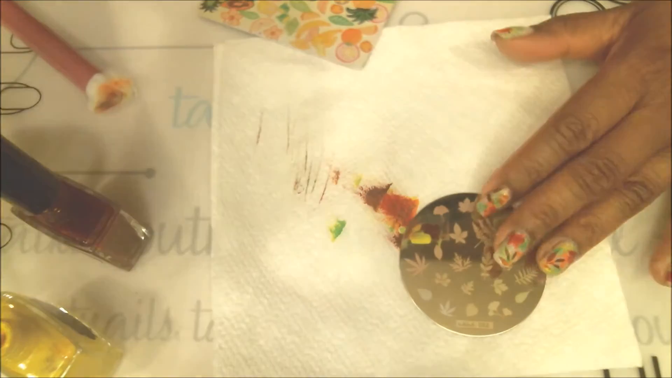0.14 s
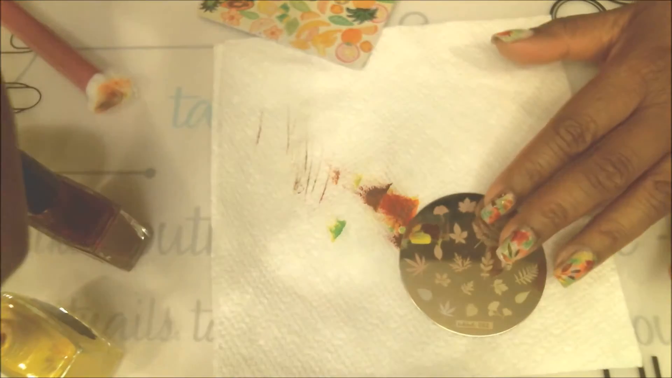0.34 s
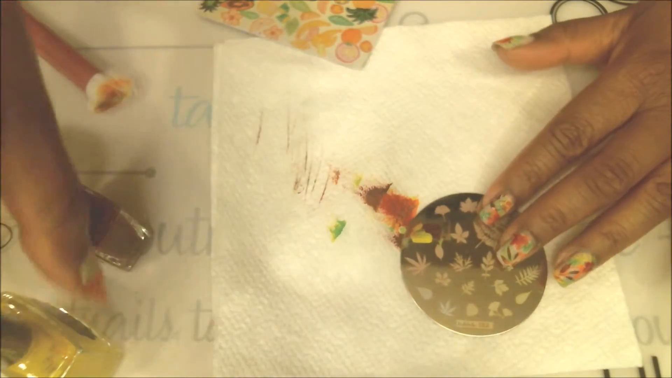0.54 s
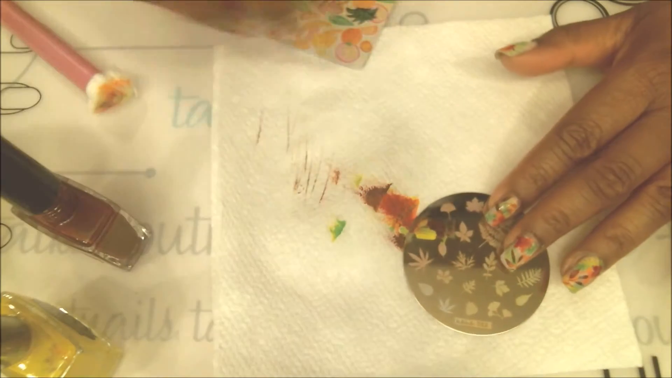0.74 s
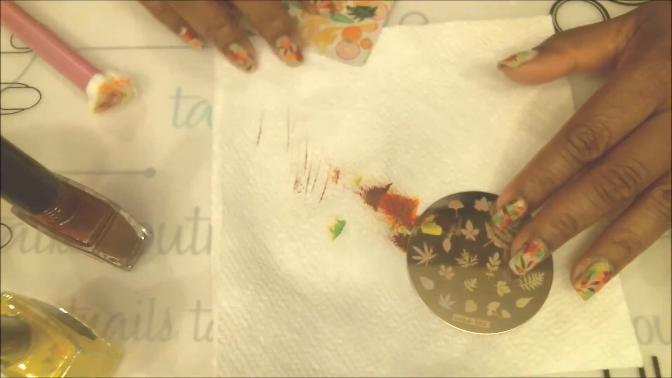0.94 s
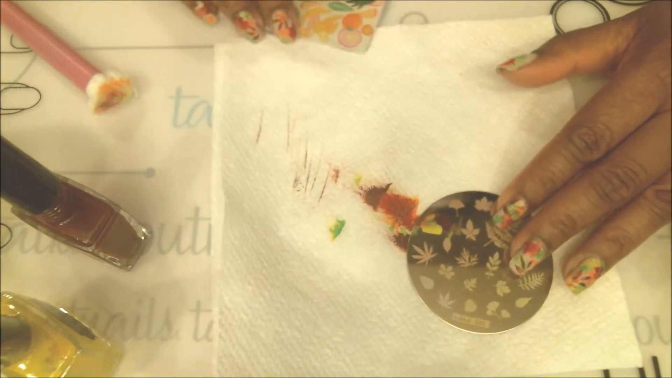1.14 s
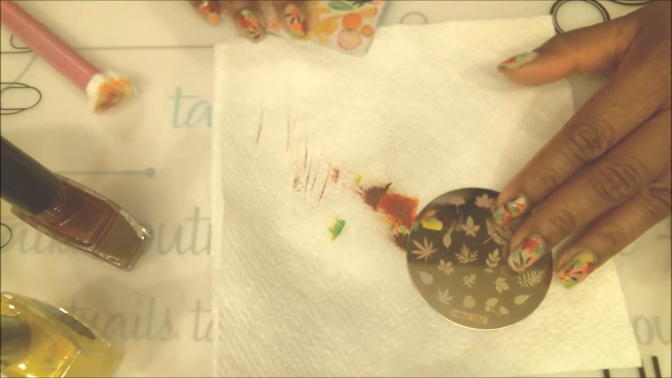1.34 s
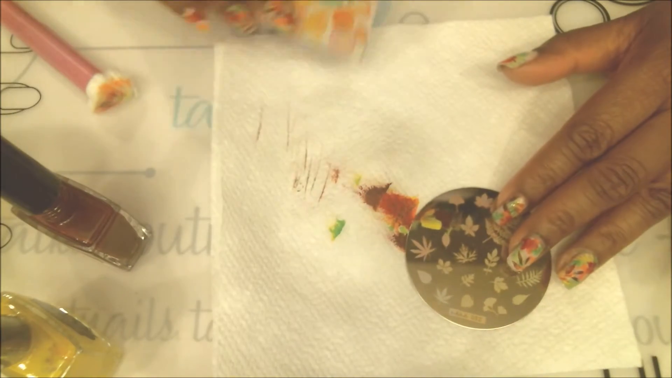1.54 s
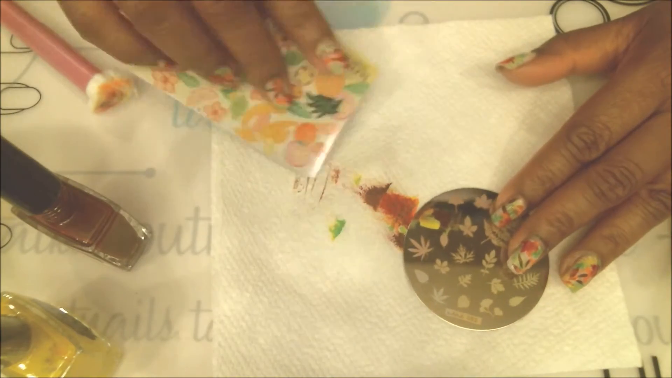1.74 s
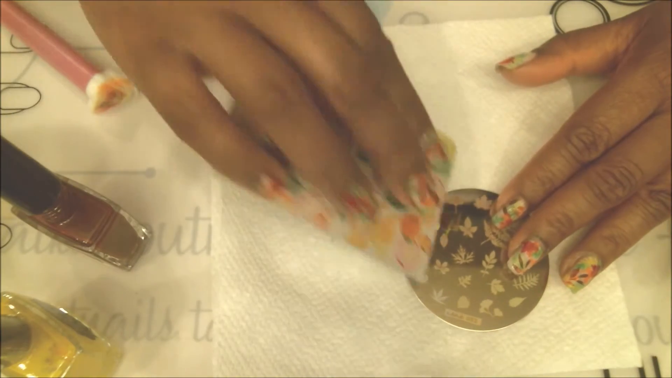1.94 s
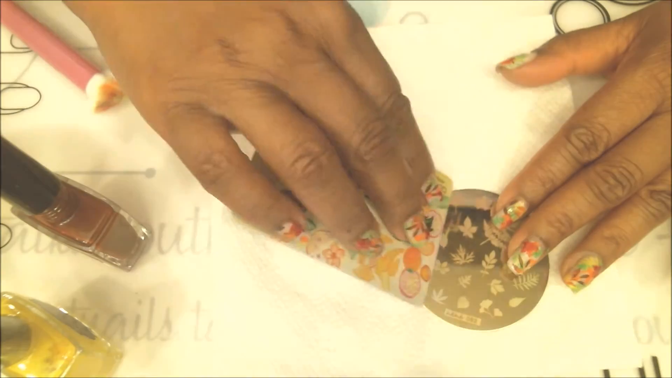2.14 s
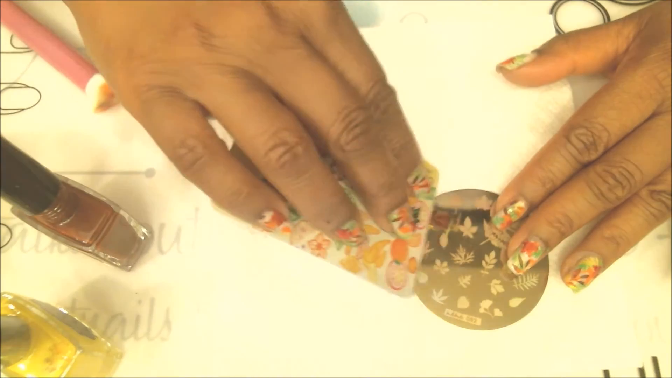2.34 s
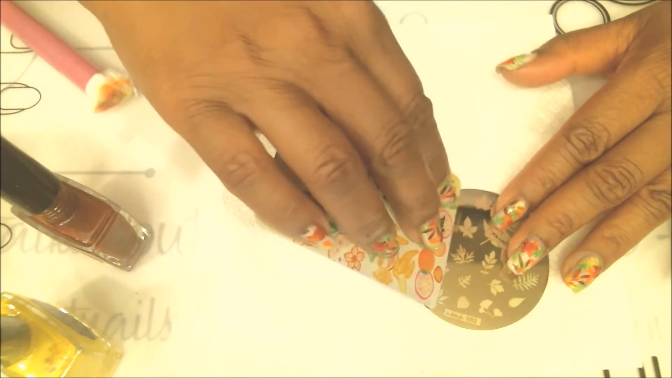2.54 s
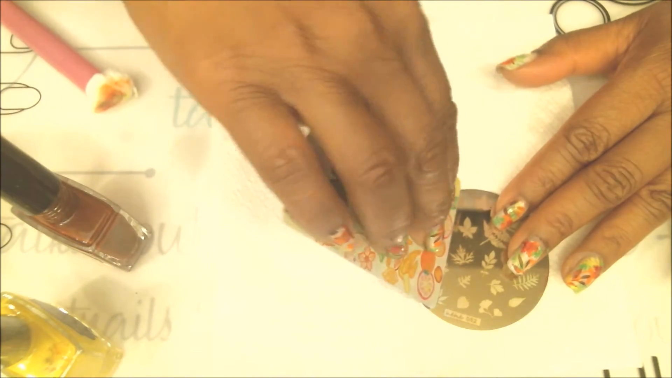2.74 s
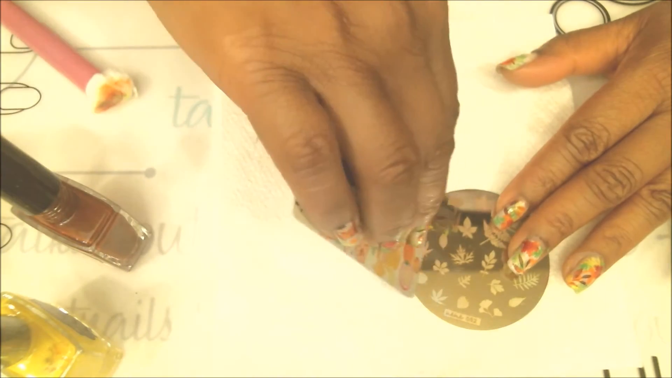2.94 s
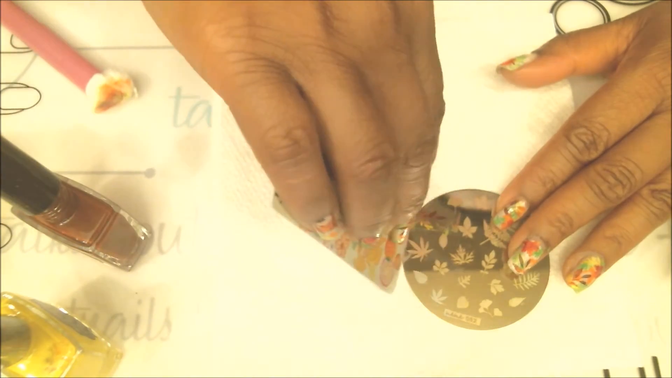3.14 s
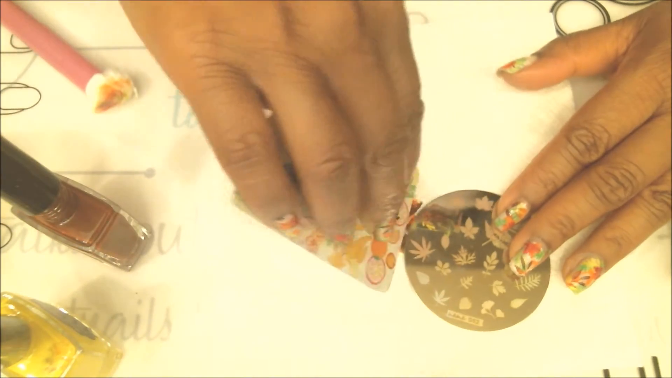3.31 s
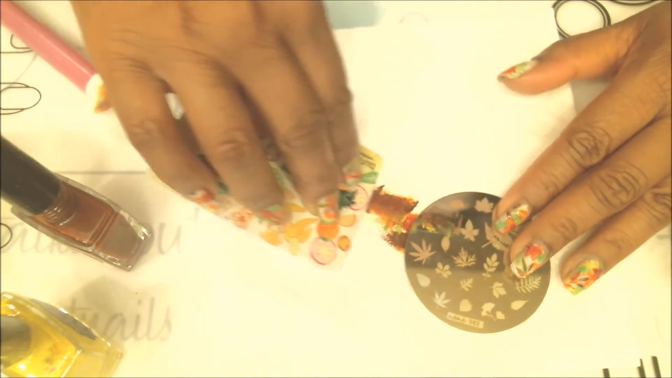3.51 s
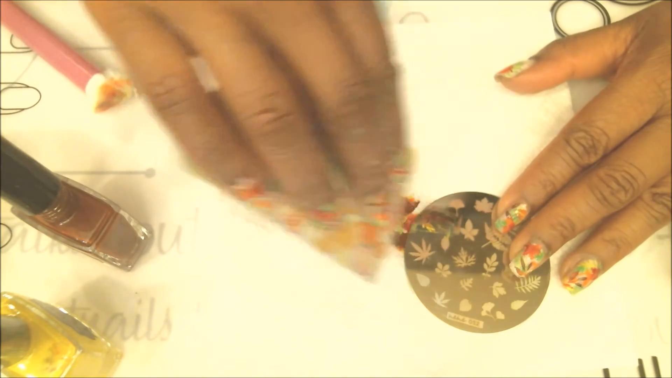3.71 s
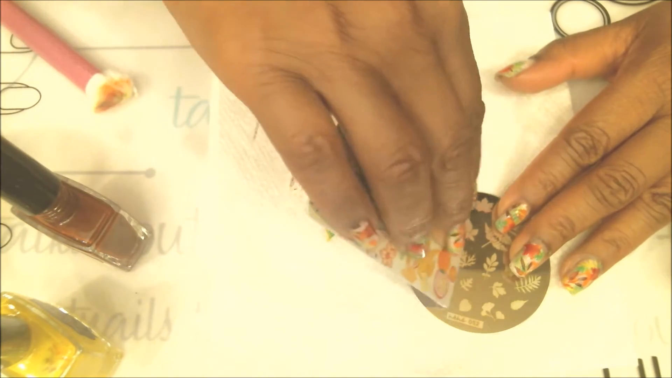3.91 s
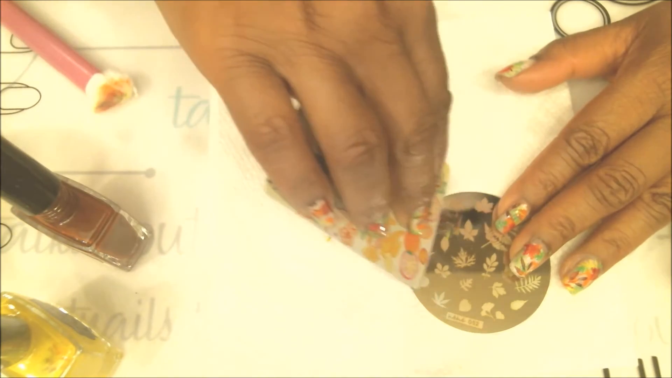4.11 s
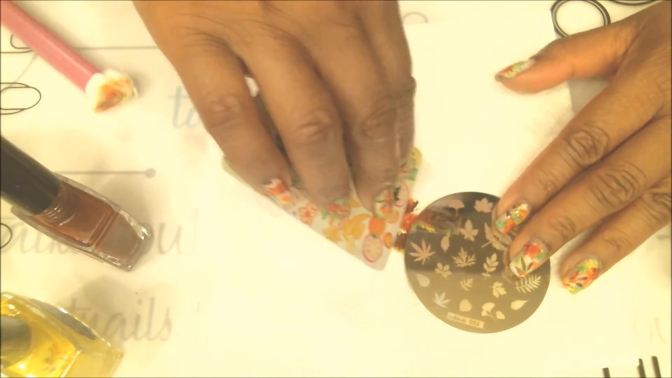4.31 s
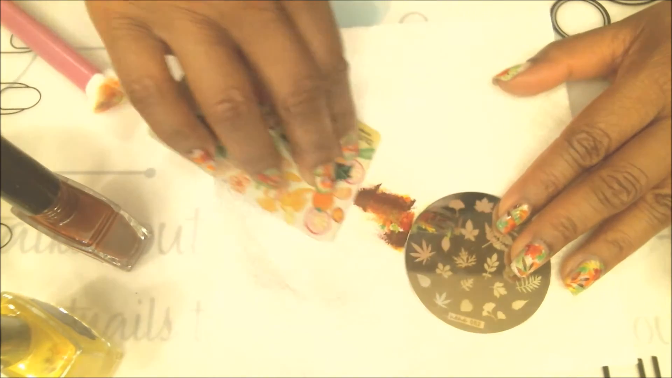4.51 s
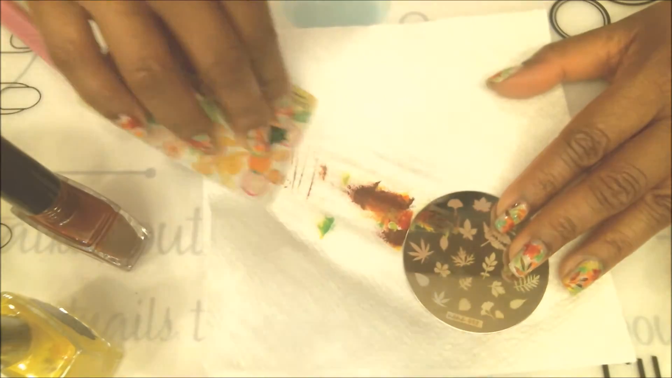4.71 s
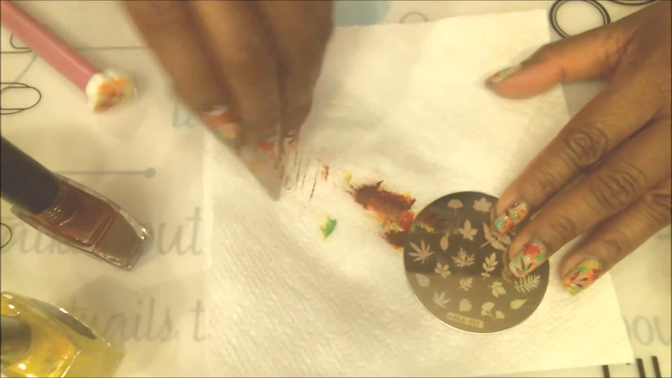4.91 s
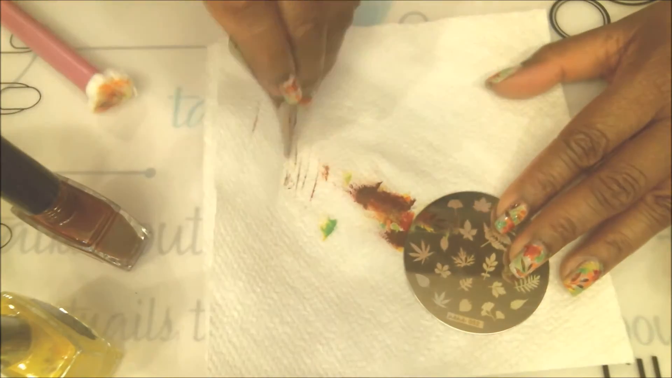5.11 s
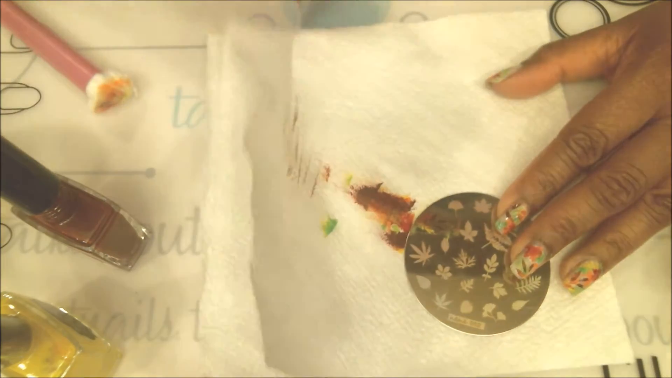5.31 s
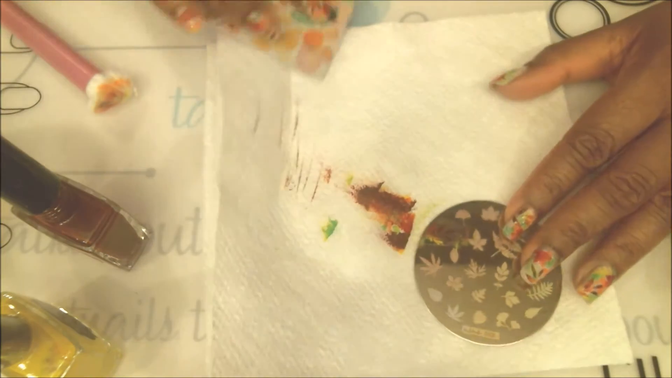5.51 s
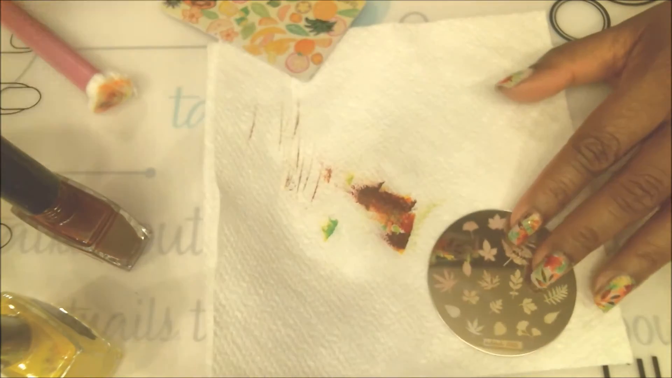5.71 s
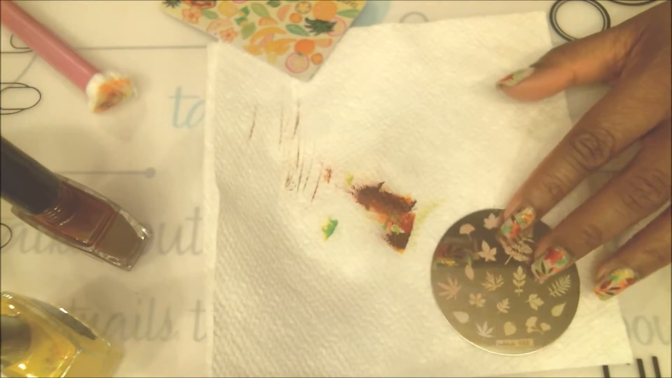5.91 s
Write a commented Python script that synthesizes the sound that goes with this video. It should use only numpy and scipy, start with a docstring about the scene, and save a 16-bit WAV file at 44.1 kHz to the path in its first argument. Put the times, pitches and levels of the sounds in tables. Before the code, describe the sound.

A plastic card slides softly off a table with light clicks, knocks and a brief squeak. It is dragged twice across a small steel plate with a fine hiss; each time it snaps off the rim, the plate clacks down and the card hisses on over a paper towel. A hand thumps the table, then the card is wiped and dropped with a short bounce. The microphone is close, in a small quiet room.

```python
"""A plastic scraper card is slid off a table, set on a small steel stamping plate and dragged across it
twice, its edge hissing in countless tiny slips. Each time it snaps off the rim, the plate slaps down,
and the card hisses on over a paper towel; then it is wiped on the towel and dropped, bouncing.
Between strokes the card clicks, knocks and squeaks under a fingernail, and the hand bumps the table.
A close microphone in a small quiet room, with a faint electrical ticking in its noise floor."""
import sys
import numpy as np
from scipy import signal
from scipy.fft import rfft
from scipy.io import wavfile
from scipy.ndimage import uniform_filter1d

SR = 44100
rng = np.random.default_rng(int(sys.argv[2]) if len(sys.argv) > 2 else 0)


def transcribe(signal):
    """Save signal, clipped to [-1, 1], as a 16-bit WAV file at the path in sys.argv[1]."""
    frames = np.atleast_2d(signal).T
    limited = np.clip(frames, -1, 1)
    pcm = np.round(limited * 32767).astype(np.int16)
    wavfile.write(sys.argv[1], SR, pcm)


N = 262395
EQ_HZ = np.fft.rfftfreq(4096, 1 / SR)
RING_T = np.arange(8192) / SR  # time since a hit, s


def amp(db):
    """Decibels to gain."""
    return 10 ** (np.asarray(db) / 20)


def curve(points, hz):
    """Breakpoints joined by straight lines over log frequency."""
    f, value = np.transpose(points)
    return np.interp(np.log(hz + 1), np.log(f + 1), value)


def add(mix, s, sound):
    """Lays a sound into the mix at time s."""
    part = mix[max(round(s * SR), 0):][:len(sound)]
    part += sound[:len(part)]


def filtered(x, order, hz, kind="low"):
    """Butterworth filter, low-pass by default."""
    return signal.sosfilt(signal.butter(order, hz, kind, fs=SR, output="sos"), x)


def eq(x, db):
    """Minimum-phase EQ with the gain db at each of EQ_HZ."""
    log_gain = np.log(amp(np.maximum(np.r_[db, db[-2:0:-1]], -100)))
    impulse = np.fft.ifft(np.exp(np.conj(signal.hilbert(log_gain)))).real
    return signal.fftconvolve(x, impulse[:len(EQ_HZ)])[:len(x)]


def unit_rms(x, band=(0, SR)):
    """Scales x to rms 1 within a band."""
    hz = np.fft.rfftfreq(len(x), 1 / SR)
    inside = rfft(x)[(hz >= band[0]) & (hz <= band[1])]
    return x * len(x) / np.sqrt(2 * np.sum(abs(inside) ** 2) + 1e-20)


def ring(modes):
    """Free ring-out of a struck body; neighbouring modes swing in opposite directions."""
    return sum((-1) ** k * amp(db - 60 * RING_T / t60) * np.sin(2 * np.pi * hz * RING_T)
               for k, (hz, db, t60) in enumerate(modes))


def strike(modes, tilt_db, chatter_s, rough):
    """A hit and a short chatter of smaller ones ring the modes; harder contact tilts them brighter."""
    force = rng.standard_normal(len(RING_T)) * np.exp(-RING_T / max(chatter_s, 1e-4))
    force *= rough / np.linalg.norm(force)
    force[0] += 1
    tones = signal.fftconvolve(force / np.linalg.norm(force), ring(modes))[:len(RING_T)]
    return eq(tones, tilt_db * np.log2(np.clip(EQ_HZ, 700, 12000) / 4000))


# the edge digs in mid-stroke: t/s, half width/s, rasp boost/dB, body boost/dB
CATCHES = [ (0.895, 0.0129, 3.5, 21), (0.99, .03, 3.5, -1.5), (1.065, .04, -2.5, 14.5),
           (1.235, 0.0083, 17.5, 25), (1.374, 0.01, 18.5, 21.5), (2.869, 0.0376, 8.5, 15),
           (2.994, .026, 9.5, 14.5), (3.18, 0.00648, 7.5, 19), (4.076, 0.014, 4, 13),
           (4.157, .014, 1, 19.5), (4.255, 0.021, 5.5, 4.5), (4.38, 0.0326, 4, 13), (4.59, 0.055, 4, -8),
           (4.779, 0.026, 3, 27.5), (4.985, .018, 5.5, -6.5), (5.14, .035, 9, -1), (5.324, 0.0091, 7.5, 27),
           ]


def gesture(row, gather_s=0.1195, catch_dulling=0.68):
    """A stroke's envelopes: the treble follows its speed; it rasps and hums where the edge digs in."""
    start, length, attack, release, hiss_db, swell_db, bright_db, dull_db, body_db = row
    t = np.arange(0, length, 1 / SR)
    fade_in, fade_out = np.sin(np.pi / 2 * np.clip([t / attack, (length - t) / release], 0, 1)) ** 2
    push_db = swell_db * (t / length - .5)
    rasp_db, hum_db = sum(np.outer([rasp, hum], np.exp(-((start + t - s) / width) ** 2))
                          for s, width, rasp, hum in CATCHES)
    treble_db = bright_db - dull_db * np.exp(-t / gather_s) - catch_dulling * rasp_db
    return t, fade_in * fade_out, hiss_db + push_db + rasp_db, treble_db, body_db + push_db + hum_db


def wandering_contact(shape, depth_db=2.5):
    """The contact point roams along the edge, favouring one resonance after another: peaks and dips."""
    field = uniform_filter1d(rng.standard_normal(shape), size=2, axis=0)
    field = uniform_filter1d(field, size=22, axis=1)
    return depth_db * field / field.std()


def stroke(row, hiss, body, grain_db, judder_db, judder_hz, hiss_trim_db, body_trim_db):
    """Countless tiny slips of the card's edge hiss, brighter with speed, and stir its low body tones."""
    t, contact, hiss_db, treble_db, body_db = gesture(row)
    grains = amp(grain_db * np.minimum(rng.exponential(1, len(t)), 5)) * (rng.random(len(t)) < .2)
    judder = unit_rms(filtered(rng.standard_normal(len(t)), 2, judder_hz))
    slips = unit_rms(rng.standard_normal(len(t)) * grains * amp(judder_db * judder))
    hz, frames, spectrum = signal.stft(slips, SR, nperseg=256, noverlap=192)
    colour = amp(curve(hiss, hz)) * np.clip(hz / 1700, 0, 1) ** 2
    colour /= np.sqrt(np.mean(colour ** 2 * (hz > 2200) * (hz < 6500)))
    # a slow stroke rolls the treble off, a fast one lifts it
    lift_db = np.interp(frames, t, treble_db) - 10 * np.log10(np.mean(colour ** 2 * (hz > 7500)))
    shelf = np.interp(hz, [5400, 8600, 12000], [0, 1, 1.4])[:, None]
    tilt_db = np.minimum(shelf, 1) * np.maximum(lift_db, 0) + shelf * np.minimum(lift_db, 0)
    # the reflection off the table combs the hiss, and the comb sweeps as the card moves
    delay_s = .0011 * (1 + 0.13 * np.sin(2 * np.pi * (1.3 * frames + rng.random())))
    comb_db = 1.5 * np.cos(2 * np.pi * hz[:, None] * delay_s)
    spectrum = spectrum * colour[:, None] * amp(tilt_db + comb_db + wandering_contact(spectrum.shape))
    rasp = signal.istft(spectrum, SR, nperseg=256, noverlap=192)[1][:len(t)]
    resonances = sum(amp(db) / (1 + 2 * ((EQ_HZ - f) / width) ** 2) for f, width, db in body)
    hum = unit_rms(eq(slips, 20 * np.log10(resonances)), band=(900, 1900))
    return contact * (amp(hiss_db + hiss_trim_db) * rasp + amp(body_db + body_trim_db) * hum)


# stroke cues, levels before trim: t/s, length/s, attack/s, release/s, hiss level/dB, swell/dB,
# brightness/dB, opening dullness/dB, body level/dB
PICK_UP_STROKES = [ (0.88, 0.23, 0.031, 0.023, -62, 6, -0.5, 13, -76.5),
                   (1.179, 0.086, .03, 0.022, -74, 8, -1, -3, -77.5),
                   (1.347, 0.0585, 0.027, .02, -67, 0, -8, 1.5, -66),
                   (1.408, .11, .008, 0.029, -60, 9, -10, 5.5, -62), ]
STEEL_STROKES = [ (1.685, .1, 0.0076, 0.0325, -68, 2, -21, -0.5, -79),
                 (2.833, .22, 0.0328, 0.0332, -55, 2, -15.5, 0, -71.5),
                 (3.11, .08, 0.012, 0.0042, -60, 10, -20.5, 1, -75),
                 (4.02, 0.27, 0.039, 0.00964, -52.5, -0.5, -14.5, 4.5, -73), ]
TOWEL_STROKES = [ (3.35, .29, 0.099, 0.14, -47.5, 0, -13.5, -6.5, -75.5),
                 (3.6, 0.084, 0.055, 0.039, -51, 9, -11, 4, -72.5),
                 (4.271, .56, 0.028, 0.056, -50.5, 7.5, -8, 7.5, -76.5), ]
WIPE_STROKES = [ (0.0, 0.064, 0.00156, 0.059, -71, -2.5, 0, 0, -90),
                (0.075, .035, .008, .025, -76.5, 0, 3, -1, -92),
                (0.53, .11, .012, 0.0297, -74, 3, -12, 0, -88),
                (2.22, 0.1, 0.049, 0.037, -62.5, 1, -16, -2, -89),
                (3.315, 0.11, 0.0219, 0.0127, -63, 2, -13.5, -2, -79),
                (4.95, .405, 0.033, 0.038, -62, -3.5, 6, 31.5, -78),
                (5.41, .145, .025, 0.074, -58, 5, -3.5, -2.5, -79.5),
                (5.59, 0.12, 0.0043, 0.051, -56, 1.5, -3, 2, -56.5),
                (5.77, 0.19, 0.033, .03, -79, -5.5, -4.5, 1.5, -82), ]
# friction colour of each kind of stroke: f/Hz, relative level/dB
PICK_UP_HISS = [(1120, -38), (1900, -22), (2090, -38), (2760, -5), (3420, -4), (4170, 1.5), (5000, -5.5),
                (6160, -3.5), (7910, -8.5), (10800, -12), (15000, -37.5)]
STEEL_HISS = [(1700, -43), (2300, -9), (2950, 0), (3600, -3), (4000, -11), (4500, -8), (5400, -10),
              (6500, -17), (7000, -16.5), (8300, -25), (9800, -25), (11300, -29.5), (12800, -55.5),
              (15500, -56)]
TOWEL_HISS = [(2000, -27.5), (2450, -11), (2950, 2.5), (3350, -5.5), (3700, -3), (4000, -10), (4500, -6.5),
              (5800, -10), (6500, -8), (7400, -10.5), (10500, -12.5), (12000, -18.5), (14000, -31.5),
              (15500, -47.5)]
WIPE_HISS = [(1120, -65.5), (1900, -19), (2090, -23), (2630, -13.5), (2870, -15.5), (3540, 0.5),
             (3900, -3.5), (4860, -5.5), (5500, -3), (6060, -3), (8530, 1), (10800, -5), (15500, -41)]
# body tones of the rubbed card: f/Hz, width/Hz, relative level/dB
HANDLING_BODY = [(494, 250, -6.5), (1190, 190, 0), (1624, 320, -3.5), (2600, 270, -9)]
STEEL_BODY = [(316, 200, 3.5), (518, 120, -5.5), (946, 110, 3), (1230, 170, 4.5), (1770, 300, -8)]
TOWEL_BODY = [(272, 100, -13), (525, 35, -1.5), (1144, 290, 0.5), (2730, 240, 5)]


def scrapes():
    """The card slides over the table, the etched steel and the paper towel."""
    out = np.zeros(N)

    def play(cues, hiss, body, **texture):
        for row in cues:
            add(out, row[0], stroke(row, hiss, body, **texture))

    play(PICK_UP_STROKES, PICK_UP_HISS, HANDLING_BODY,
         grain_db=0.69, judder_db=1.3, judder_hz=148, hiss_trim_db=-0.5, body_trim_db=2.0)
    play(STEEL_STROKES, STEEL_HISS, STEEL_BODY,
         grain_db=0.6, judder_db=1.0, judder_hz=140, hiss_trim_db=-0.5, body_trim_db=0.5)
    play(TOWEL_STROKES, TOWEL_HISS, TOWEL_BODY,
         grain_db=0.2, judder_db=-0.1, judder_hz=158, hiss_trim_db=0.5, body_trim_db=-1.0)
    play(WIPE_STROKES, WIPE_HISS, HANDLING_BODY,
         grain_db=0.4, judder_db=0.5, judder_hz=160, hiss_trim_db=-1.1, body_trim_db=-1.5)
    return out


# reverb decay: f/Hz, t60/s
ROOM_T60 = [(100, 0.21), (300, 0.09), (700, 0.11), (2500, 0.13), (8000, 0.19), (15000, 0.1)]
# reverb send: f/Hz, relative level/dB
ROOM_SEND = [(100, -15), (300, -2), (700, -17), (2500, -18), (8000, -28), (15000, -22)]


def room(x, spacing=20):
    """Sparse reflections off the table and walls, each band dying at its own speed."""
    echoes = np.zeros(SR // 2)
    slots = np.arange(330, len(echoes) - spacing, spacing)  # samples, after a short pre-delay
    echoes[slots + rng.integers(0, spacing, len(slots))] = rng.choice([-1., 1.], len(slots))
    hz, t, tail = signal.stft(echoes, SR, nperseg=256)
    tail = tail * amp(-60 * t / curve(ROOM_T60, hz)[:, None])
    tail *= amp(curve(ROOM_SEND, hz))[:, None] / np.linalg.norm(tail, axis=1, keepdims=True) / 148
    return signal.fftconvolve(x, signal.istft(tail, SR, nperseg=256)[1])[:N]


# colour of the noise floor: f/Hz, relative level/dB
ROOM_TONE = [(40, -32), (100, -17), (200, -9.5), (400, -14.5), (600, -13), (1180, -13.5), (1450, -26.5),
             (1760, -17), (2000, -24.5), (2800, -28.5), (3200, -23.5), (3800, -31.5), (6000, -36),
             (16000, -39.5)]


def room_tone(level_db=-72):
    """A steady bed of room and microphone noise."""
    return amp(level_db) * unit_rms(eq(rng.standard_normal(N), curve(ROOM_TONE, EQ_HZ)))


def ticking(rate_hz=30, width_s=.0013, tick_db=-60, flutter_db=-71):
    """Dull electrical ticks, regular in time and uneven in size; a low flutter follows each."""
    cycles = np.arange(N) / SR * rate_hz + .67
    from_tick_s = (cycles % 1 - .5) / rate_hz
    tick_spread, flutter_spread = rng.standard_normal((int(cycles[-1]) + 2, 2)).T
    u = (from_tick_s / width_s) ** 2
    ticks = amp(tick_db + 3.5 * tick_spread[cycles.astype(int)]) * (2 * u - 1) * np.exp(-u)
    rumble = unit_rms(filtered(rng.standard_normal(N), 2, [85, 340], "band"))
    flutter_cycles = cycles + .62
    swell = np.sin(np.pi * np.sqrt(flutter_cycles % 1)) ** 2
    return ticks + rumble * swell * amp(flutter_db + 4 * flutter_spread[flutter_cycles.astype(int)])


# colour of a hard contact: f/Hz, level/dB
CRACK_EQ = [(200, -15), (600, -4.5), (1700, -3), (3200, 2), (4400, 3), (5100, -5.5), (6500, -3.5),
            (8000, -7.5), (10500, -8.5), (13000, -20), (16000, -40)]


def crack(decay_s):
    """The dry clack of a hard contact: a spike, then dense, quickly damped vibration."""
    burst = rng.standard_normal(len(RING_T)) * np.exp(-RING_T / decay_s)
    burst[0] = 6
    return eq(burst, curve(CRACK_EQ, EQ_HZ))


# the edge taps the plate or a fingernail, and last the dropped card ticks on the table: # t/s, relative click
# level/dB, tilt/dB per octave, chatter/s, flex level/dB
TAPS = [ (0.0742, -60, 20.5, .0005, -84), (0.7, -61, 9, 0.0034, -84), (1.0912, -41.5, 11, .0003, -43.5),
        (1.229, -44, 12, 0.00226, -55), (1.4367, -40, -7.5, .001, -63), (2.0886, -24.5, 5.5, 0.0012, -55.5),
        (2.0949, -41.5, -5, .001, -60), (2.1336, -52, -3.5, .0006, -75), (2.512, -43.5, 0, .0034, -73),
        (2.524, -49.5, 4, 0.013, -77), (2.5506, -41.5, -8.5, 0.00086, -65.5),
        (2.8415, -45.5, -10, 0.00065, -64), (2.9831, -33, 3, .0008, -60), (3.1637, -42, 0, .0008, -70),
        (3.2781, -51, -11, 0.0013, -75), (3.643, -39, 7.5, 0.00048, -80),
        (3.9216, -27.5, 15.5, .0008, -54.5), (3.9241, -26.5, 6, 0.00133, -45.5),
        (3.936, -45.5, -9, 0.0075, -46.5), (4.2876, -32, -1, 0.00053, -58),
        (5.4768, -41.5, 17, 0.00034, -74.5), (5.551, -52, 2, .001, -66.5),
        (5.6712, -32.5, 6.5, 0.00104, -47)]
# stiff modes of the card: f/Hz, level/dB, t60/s
CARD_MODES = [(1000, -25.5, 0.0073), (1887, -5.5, 0.0061), (2517, 0.5, 0.016), (2990, 3.5, 0.01),
              (3490, 1.5, 0.0098), (4264, -0.5, 0.0071), (5370, 2.5, 0.0034), (6120, -7.5, 0.013),
              (7056, -5.5, 0.0054), (9660, -14, 0.0028), (10464, -18, 0.0035)]


def taps(flex_hz=1165, flex_t60=0.031):
    """Each tap clicks the card's stiff modes with a dry crack and flexes it in the fingers."""
    out = np.zeros(N)
    for s, db, tilt_db, chatter_s, flex_db in TAPS:
        tones = strike(CARD_MODES, tilt_db, chatter_s, rough=chatter_s / .002)
        click = amp(-5) * tones + amp(-11) * crack(decay_s=0.0018)
        add(out, s, amp(db) * click + ring([(flex_hz, flex_db, flex_t60)]))
    return out


# the hand bumps the table: t/s, level/dB
BUMPS = [(0.557, -53.5), (2.258, -57.5), (2.996, -52.5), (3.22, -37), (4.297, -38.5), (4.9178, -28),
         (5.326, -53.5)]
# modes of the table top: f/Hz, level/dB, t60/s
TABLE_MODES = [(107.7, -13, 0.2), (154.5, -5.5, 0.077), (218.5, 0.5, 0.053), (268, -3, 0.049),
               (341.9, -6.5, 0.087), (419, -6, 0.037), (1015, -6.5, 0.019)]


def bumps(soft_hz=700, rebound_s=.036, rebound_db=-10):
    """The soft hand thumps the table's low modes; two rebounds follow, each weaker and duller."""
    out = np.zeros(N)
    for k in range(3):
        thud = filtered(ring(TABLE_MODES), 1, soft_hz / (1 + k))
        for s, db in BUMPS:
            add(out, s + k * rebound_s, amp(db + k * rebound_db) * thud)
    return out


# the flat of the card meets the table, or once the towel as it leaves the rim: t/s, knock level/dB, click
# level/dB
KNOCKS = [(0.888, -51, -62), (1.4687, -40, -39), (1.4938, -35.5, -36.5), (4.153, -48, -59),
          (4.272, -32, -46.5), (5.14, -52, -51.5), (5.158, -58, -52)]
# modes of the card pressed on the table: f/Hz, level/dB, t60/s
PRESSED_CARD_MODES = [(391, -7.5, 0.0295), (554.2, 2.5, 0.0362), (701, -4.5, 0.013)]


def knocks():
    """Pressed against the table, or once the towel, the card gives a hollow knock under its click."""
    out = np.zeros(N)
    for s, db, click_db in KNOCKS:
        hollow = strike(PRESSED_CARD_MODES, tilt_db=0, chatter_s=0.0042, rough=0.58)
        add(out, s, amp(db) * hollow + amp(click_db) * crack(decay_s=0.00082))
    return out


# a fingernail slips on the card: t/s, level/dB
NAIL_SLIPS = [(1.693, -44), (1.7099, -47), (1.722, -47), (1.7562, -47)]
# modes of the squeak: f/Hz, level/dB, t60/s
SQUEAK_MODES = [(1100, -27, .01), (2757, 1.5, .012), (3170, -1.5, .012), (3830, -13, 0.0067),
                (6190, -16, 0.0047)]


def squeak():
    """A fingernail sticks and slips; each slip is a short grainy chirp of the card's stiff modes."""
    out = np.zeros(N)
    for s, db in NAIL_SLIPS:
        add(out, s, amp(db) * strike(SQUEAK_MODES, tilt_db=-1.5, chatter_s=0.0046, rough=2.8))
    return out


# the card snaps off the rim: t/s, ring level/dB, tilt/dB per octave, thud level/dB, crack level/dB
SNAPS = [(3.1840, -28, -1, -64.5, -28.5), (3.185, -19.5, 0, -34, -13), (4.2696, -32.5, 1.5, -45, -20.5),
         (4.2704, -24.5, -1, -42.5, -18.5)]
# modes of the steel plate on its towel: f/Hz, level/dB, t60/s
PLATE_MODES = [(696.3, -5, .022), (852, -2.5, 0.021), (1007, -2.5, 0.04), (1153, -12.5, 0.023),
               (1618, -10, 0.031), (2125, -11.5, 0.014), (2430, -5, 0.036), (2751, -11, 0.04),
               (3340, -3.5, 0.0099), (3980, -4.5, 0.01), (4480, -2.5, 0.036), (5581, -1.5, 0.014),
               (7060, -4.5, 0.019), (8930, -12, .016), (9900, -9, 0.014), (11780, -16, 0.02)]


def snaps(rattle_db=-21, rattle_hz=1800):
    """The plate slaps down: it cracks, rings briefly, rattles dully on its towel and thuds the table."""
    out = np.zeros(N)
    for s, db, tilt_db, thud_db, crack_db in SNAPS:
        tones = strike(PLATE_MODES, tilt_db, chatter_s=.0008, rough=.15)
        clack = crack(decay_s=0.0034) + amp(rattle_db) * filtered(crack(decay_s=0.025), 1, rattle_hz)
        add(out, s, amp(db) * tones + amp(crack_db) * clack + amp(thud_db) * ring(TABLE_MODES))
    return out


def groan(start_s=4.765, length_s=0.102, pitch_hz=519, waver_hz=60, level_db=-55):
    """The card's corner sticks and slips with a low rub as it leaves the towel."""
    out = np.zeros(N)
    t = np.arange(0, length_s, 1 / SR)
    waver = filtered(rng.standard_normal(len(t)) + 1j * rng.standard_normal(len(t)), 2, waver_hz)
    tone = (waver * np.exp(2j * np.pi * pitch_hz * t)).real
    add(out, start_s, amp(level_db) * np.sin(np.pi * t / length_s) * unit_rms(tone))
    return out


# the dropped card bounces on the table: t/s, ring level/dB, tilt/dB per octave, crack level/dB
BOUNCES = [(5.5674, -25.5, 1, -39), (5.5709, -16, 4, -14), (5.5708, -31, 0, -33.5),
           (5.5841, -17.5, -0.5, -26.5), (5.6156, -38.5, -3, -43), (5.648, -43.5, -1.5, -54)]
# modes of the card lying free: f/Hz, level/dB, t60/s
LOOSE_CARD_MODES = [(260.5, -20, 0.069), (590, -13, 0.024), (826, -10, 0.028), (1153, -0.5, 0.022),
                    (1545, -11.5, 0.021), (2038, -7.5, 0.012), (2960, -18.5, 0.023), (3290, -10.5, 0.018),
                    (4240, -29.5, 0.0094), (6390, -11.5, 0.0104)]


def drop():
    """The card lands on one edge, then flat, and settles."""
    out = np.zeros(N)
    for s, db, tilt_db, crack_db in BOUNCES:
        tones = strike(LOOSE_CARD_MODES, tilt_db, chatter_s=.0006, rough=.25)
        add(out, s, amp(db) * tones + amp(crack_db) * crack(decay_s=0.0015))
    return out


def scene(card_band_hz=(150, 12500)):
    """The table-top mix in its room; the small card's hits radiate little bass or top end."""
    card_hits = filtered(taps() + knocks() + squeak() + drop(), 3, card_band_hz, "band")
    direct = scrapes() + groan() + snaps() + card_hits + bumps()
    return (direct + room(direct) + room_tone())[None]


def record(dry):
    """The microphone's bass roll-off, the ticking of its electronics, then a steep high cut."""
    thin = filtered(dry, 5, 62, "high") + ticking()
    high_cut = signal.firwin(511, 16100, window=("kaiser", 9), fs=SR)
    return signal.oaconvolve(thin, high_cut[None], "same")


dry = scene()
out = record(dry)
transcribe(out)
```